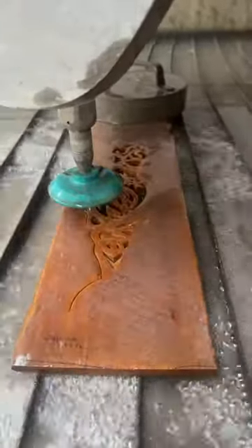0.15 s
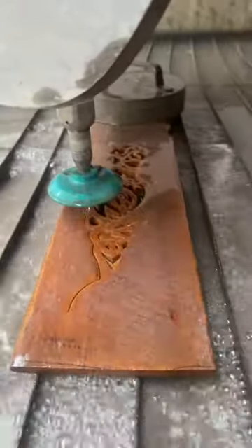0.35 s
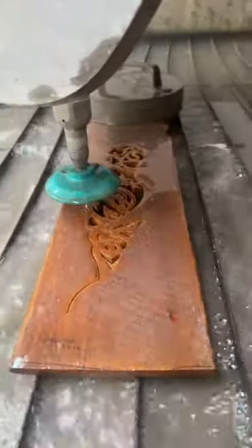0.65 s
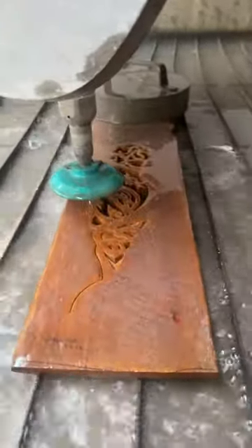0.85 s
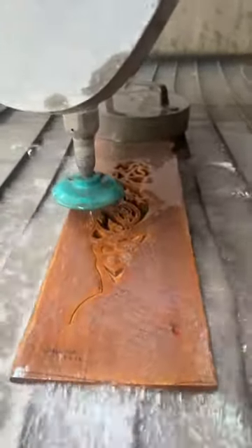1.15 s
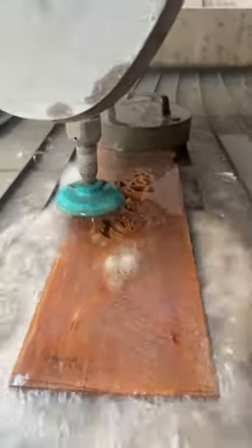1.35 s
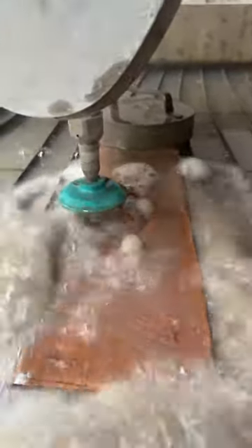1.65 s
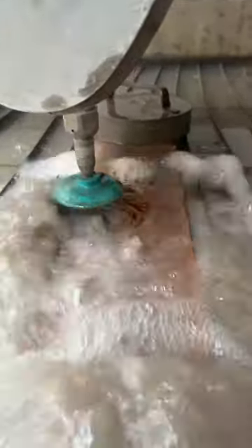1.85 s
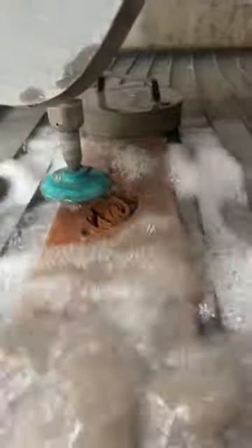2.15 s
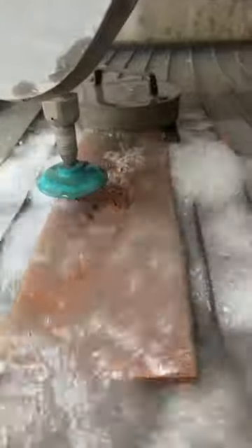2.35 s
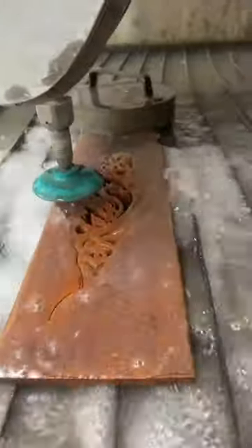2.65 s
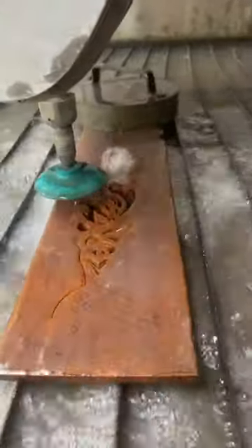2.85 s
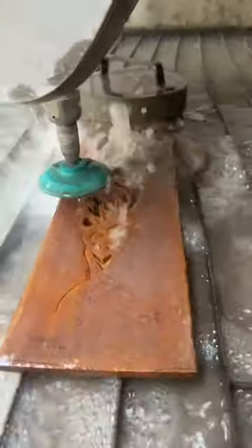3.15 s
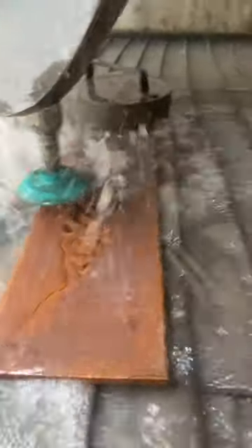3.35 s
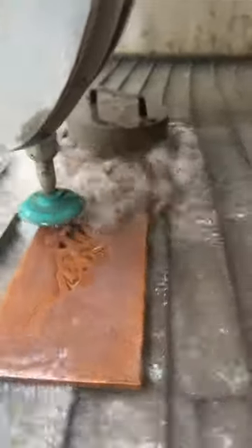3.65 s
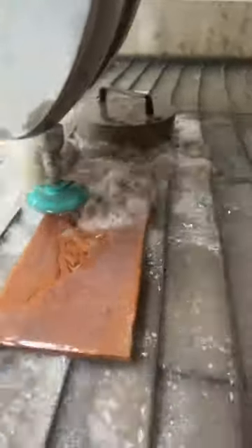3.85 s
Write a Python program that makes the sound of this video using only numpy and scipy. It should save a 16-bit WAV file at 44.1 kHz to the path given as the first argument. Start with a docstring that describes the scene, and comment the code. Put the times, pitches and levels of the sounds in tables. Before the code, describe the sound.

A waterjet cutter hisses and roars over a wooden board, gets smothered by water, then stutters off and on.

```python
"""A waterjet cuts a wooden board, close to a mono microphone in a workshop.
At first the jet hisses, rasps in the kerf and roars in the tank: shaped noise plus bubble rings.
A flood then turns the roar to churn and dulls the rasp, while a smothered hiss loses its top; it clears.
Last, the jet stops four times, each with a diving sine chirp; noise and drop rings trickle in the pauses.
A dull noise puff swells into each restart, and the jet is still running at the end."""
import sys
import numpy as np
from scipy import signal
from scipy.fft import rfft, irfft, next_fast_len
from scipy.io import wavfile
from scipy.ndimage import uniform_filter1d, map_coordinates

SR = 44100
rng = np.random.default_rng(int(sys.argv[2]) if len(sys.argv) > 2 else 0)


def wav_record(signal):
    """Record a signal, one row per channel, as 16-bit PCM in the file named by sys.argv[1]."""
    frames = np.transpose(np.atleast_2d(signal))
    bounded = np.clip(frames, -1, 1)
    # unit amplitude maps onto the largest positive 16-bit level
    quanta = np.round(bounded * 32767).astype(np.int16)
    wavfile.write(sys.argv[1], SR, quanta)


N = 176400


def amp(db):
    """Decibels to gain."""
    return 10 ** (np.asarray(db) / 20)


def unit(x):
    """Scale to rms 1."""
    return x / np.sqrt(np.mean(x ** 2) + 1e-20)


def along(points, hz):
    """Interpolate (Hz, value) points on a log frequency axis."""
    point_hz, value = np.transpose(points)
    return np.interp(np.log(hz + 1), np.log(point_hz + 1), value)


def curves(rows):
    """One value per sample for each column after the time."""
    time_s, *columns = np.transpose(rows)
    return np.array([np.interp(np.arange(N) / SR, time_s, column) for column in columns])


def wobble(knots_per_s):
    """Smooth random curve through normally distributed knots."""
    return map_coordinates(rng.standard_normal(8192), [np.arange(N) * knots_per_s / SR], mode="wrap")


def filtered(x, response):
    """Multiply the spectrum of x by response(hz)."""
    size = next_fast_len(N + SR // 2)
    return irfft(rfft(x, size) * response(np.fft.rfftfreq(size, 1 / SR)), size)[:N]


def coloured(x, spectrum):
    """Shape x with a spectrum, at rms 1."""
    return unit(filtered(x, lambda hz: amp(along(spectrum, hz))))


def lift(resonances, hz):
    """Decibels added by resonances, each a Gaussian over frequency."""
    return sum(db * np.exp(-((hz - centre) / width) ** 2) for centre, width, db in resonances)


def spray(patchy_db, spit_db):
    """White noise in random time-frequency patches, its level spitting by the millisecond; rms 1."""
    z = signal.stft(rng.standard_normal(N), nperseg=512)[2]
    field = uniform_filter1d(rng.standard_normal(z.shape), size=7, axis=0)
    field = uniform_filter1d(field, size=5, axis=1)
    patchy = signal.istft(z * amp(patchy_db * unit(field)), nperseg=512)[1][:N]
    return unit(patchy * amp(spit_db * wobble(700)))


def bubbles(count, hz, spread, cycles, scatter_db):
    """Short damped rings of random pitch and size, down 60 dB after the given cycles; rms 1."""
    when, pitch, size = rng.random(count), rng.standard_normal(count), rng.exponential(size=count)
    t = np.arange(700) / SR
    ring_hz = np.clip(hz * np.exp(spread * pitch), 200, 15000)
    turns = ring_hz[:, None] * t
    ring_gain = amp(scatter_db * np.minimum(size, 4))[:, None]
    rings = ring_gain * np.sin(2 * np.pi * turns) * amp(-60 * turns / cycles)
    at = (when * N).astype(int)[:, None] + np.arange(len(t))
    return unit(np.bincount(at.ravel(), rings.ravel(), N)[:N])


def room(x):
    """Short answer of the tank and the machine: noise decaying faster in the treble."""
    # columns: freq_hz, t60_s
    decay_t60 = [(100, 0.089), (500, 0.055), (3000, 0.045), (12000, .03)]
    hz, t, z = signal.stft(rng.standard_normal(SR // 3), SR, nperseg=256)
    decay = amp(-60 * t / along(decay_t60, hz)[:, None])
    tail = signal.istft(z * decay, SR, nperseg=256)[1]
    delayed = np.pad(tail, (200, 0))  # samples
    return signal.fftconvolve(x, delayed / np.linalg.norm(tail))[:N]


def trickle():
    """Water falls back and drains over the slats: coloured spray and ringing drops."""
    # spectrum; columns: freq_hz, level_db
    trickle_spectrum = [(20, -45), (45, -27), (90, -4), (300, -12), (1200, -2), (2500, -4.5), (4200, -1),
                        (5300, -3), (8000, 1.5), (10000, 2), (11800, -2), (15500, -12)]
    # spray level; columns: time_s, level_db
    trickle_level = [(2.8, -54), (3.23, -52), (3.46, -46), (3.51, -52), (3.62, -50), (3.665, -44),
                     (3.7, -54.5)]
    drops = bubbles(count=900, hz=4440, spread=.6, cycles=39, scatter_db=1)
    runnel = coloured(spray(patchy_db=0.0, spit_db=-2), trickle_spectrum)
    return amp(curves(trickle_level)[0]) * (runnel + amp(-11) * drops)


def puff():
    """Dull noise swelling just before each start of the jet and dying away after it."""
    # jet runs; columns: start_s, stop_s, rise_s
    # spectrum; columns: freq_hz, level_db
    puff_spectrum = [(60, -26), (300, -5), (1200, 3), (2500, -5), (5000, -29), (15000, -45)]
    swell_s, level_db = 0.0049, -36
    t = np.arange(N) / SR
    swell = sum(np.exp(-abs(t - start) / swell_s) for start, stop, rise in JET_RUNS)
    return amp(level_db) * swell * coloured(rng.standard_normal(N), puff_spectrum)


def shut_offs():
    """As the jet breaks off, a chirp dives from treble to bass within milliseconds."""
    # columns: start_s, level_db, cycles per e-fold of time, decay_s
    chirps = [(2.741, -2, 0.89, .007), (3.1939, -2.5, 1.1, 0.0099), (3.4189, -2, 1.03, 0.0065),
              (3.577, -4, 0.97, 0.0091)]
    start_hz, knee_s, rise_s = 4150, 0.0018, 0.000092
    out = np.zeros(N)
    for start_s, level_db, cycles, decay_s in chirps:
        t = np.maximum(np.arange(N) / SR - start_s, 0)
        phase = 2 * np.pi * cycles * np.log1p(t * start_hz / cycles)
        envelope = (1 - np.exp(-t / rise_s)) * np.exp(-t / decay_s) / np.sqrt(1 + t / knee_s)
        out += amp(level_db) * np.sin(phase) * envelope
    return out


def whistle():
    """Narrow band of noise that sings in the nozzle."""
    # columns: time_s, level_db
    whistle_level = [(0, -29), (.35, -34), (.6, -37), (1.3, -41), (1.52, -38), (1.68, -63), (2.1, -57),
                     (2.36, -36), (2.55, -40), (2.92, -36), (3.3, -52)]
    centre_hz, half_width_hz = 5646, 100
    band = filtered(rng.standard_normal(N), lambda hz: 1 / (1 + ((hz - centre_hz) / half_width_hz) ** 2))
    return amp(curves(whistle_level)[0]) * unit(band)


def hiss(level_db):
    """Fine spray through the resonances of nozzle and guard, duller when smothered."""
    # spectrum; columns: freq_hz, level_db
    hiss_spectrum = [(1200, -30), (3500, -9), (4600, -6.5), (5100, -7.5), (6400, 0.5), (7200, 0),
                     (7900, 0.5), (8450, -1.5), (9400, 1), (10700, 0), (11500, -4), (12600, -5.5),
                     (14000, -3.5), (15400, -2)]
    # nozzle and guard; columns: centre_hz, width_hz, lift_db
    nozzle = [(5700, 270, 3.5), (6310, 82, 1.5), (8930, 110, 4), (9670, 500, 5), (10380, 360, 4.5)]
    muffle_below_db, muffle_db_per_db, muffle_hz = -28, 0.81, 10500
    fine = spray(patchy_db=2.0, spit_db=1.5)
    x = unit(filtered(fine, lambda hz: amp(along(hiss_spectrum, hz) + lift(nozzle, hz))))
    top = filtered(x, lambda hz: 1 / (1 + (muffle_hz / (hz + 1)) ** 20))
    top_db = muffle_db_per_db * np.minimum(level_db - muffle_below_db, 0)
    return amp(level_db) * (x - top + top * amp(top_db))


def roar(flood):
    """Jet roaring in the tank, crossfading to a churn under the flood, with gurgling bubbles."""
    # open and flooded spectra; columns: freq_hz, level_db
    roar_spectrum = [(20, -46), (38, -40), (60, -16.5), (100, -3.5), (165, 0), (320, -0.5), (500, 0.5),
                     (800, -4), (1200, -9), (2200, -39), (5000, -70)]
    churn_spectrum = [(25, -65), (45, -40), (70, -19), (130, -12), (220, -4.5), (370, 1.5), (700, -1.5),
                      (1000, -7.5), (1600, -13), (4000, -58)]
    open_roar = np.sqrt(1 - flood) * coloured(spray(patchy_db=2, spit_db=1.5), roar_spectrum)
    churn = np.sqrt(flood) * coloured(spray(patchy_db=1.5, spit_db=1), churn_spectrum)
    gurgle = bubbles(count=900, hz=432, spread=0.32, cycles=15, scatter_db=3)
    return open_roar + churn + amp(-13.5) * gurgle


def kerf(x, flood):
    """Resonance of the cut moves as water fills and leaves it; a flood dulls it."""
    # wet kerf resonance; columns: time_s, centre_hz, lift_db
    kerf_resonance = [(0, 2100, 14), (.25, 2176, 0), (.33, 1200, -2), (.46, 1130, 8), (.58, 1420, 7),
                      (.7, 2200, 1), (.85, 1470, 3), (.96, 1700, 5), (1.08, 1380, 6), (1.24, 1800, 11),
                      (1.34, 1140, -8), (1.55, 1150, -5), (1.64, 1480, 11), (1.715, 2070, 12),
                      (1.77, 1150, -3), (1.86, 1170, 4), (1.92, 1770, 14), (1.97, 1400, 6),
                      (2.025, 2250, 11), (2.05, 3160, 7), (2.16, 1488, -4), (2.29, 3200, 9),
                      (2.36, 1050, -9), (2.47, 3200, 5), (2.68, 2185, -2), (2.97, 1310, -0.5),
                      (3.16, 1850, 3), (3.3, 2850, 2), (3.56, 3550, 1), (3.73, 2475, 1), (3.79, 1900, 7.5),
                      (3.85, 2250, 3), (3.9, 2100, 8.5), (4.0, 2450, 8)]
    # rasp spectrum; columns: freq_hz, level_db
    rasp_spectrum = [(150, -31), (500, -11.5), (900, -4), (1300, -3), (2000, -2), (2600, -2), (3300, 1),
                     (4300, -2.5), (5500, -6.5), (8000, -18), (16000, -55)]
    # gap between guard and board; columns: centre_hz, width_hz, lift_db
    gap = [(990, 150, 3.5), (1273, 60, 5.5), (1443, 87, -2.5), (1530, 36, 2), (1844, 37, 3),
           (2250, 130, 1.5), (2690, 120, -2.5), (3090, 63, 2)]
    width_octaves, skirt_octaves, skirt_db_per_octave = 0.46, 0.82, 5
    dull_db, dull_hz = 6.5, 2390
    hz, t, z = signal.stft(x, SR, nperseg=1024, noverlap=768)
    time_s, centre_hz, lift_db = np.transpose(kerf_resonance)
    octaves = np.log2((hz[:, None] + 1) / np.interp(t, time_s, centre_hz))
    peak_db = np.interp(t, time_s, lift_db) * np.exp(-(octaves / width_octaves) ** 2)
    # the rasp thins out well below the resonance
    skirt_db = skirt_db_per_octave * np.minimum(octaves + skirt_octaves, 0)
    above = 1 / (1 + (dull_hz / (hz + 1)) ** 10)
    dull = np.outer(above, np.interp(t, np.arange(N) / SR, flood ** 2))
    fixed_db = along(rasp_spectrum, hz) + lift(gap, hz)
    gain = amp(fixed_db[:, None] + peak_db + skirt_db - dull_db * dull)
    gain /= np.linalg.norm(gain, axis=0)  # level independent of the shape
    return unit(signal.istft(z * gain, SR, nperseg=1024, noverlap=768)[1][:N])


def rasp(flood):
    """Spray and spattering bubbles ring in the kerf."""
    spatter = bubbles(count=2500, hz=2125, spread=0.451, cycles=23, scatter_db=4)
    return kerf(spray(patchy_db=2.4, spit_db=1.5) + amp(-13) * spatter, flood)


def valve_and_levels():
    """Valve gain, opening and shutting in ramps, and the roar, rasp and hiss levels of each run."""
    # one table per run; columns: time_s, roar_db, rasp_db, hiss_db (before the trims in jet)
    run_levels = [
        [(0, -33, -29.5, -19), (.09, -36.5, -27, -17), (.22, -30, -27, -16.5), (.4, -26, -29, -18),
         (.56, -30.5, -31.5, -19.5), (.68, -29.5, -25, -21), (.95, -30.5, -26, -20.5),
         (1.09, -30.5, -28.5, -20), (1.22, -31, -29.5, -23), (1.28, -33.5, -30.5, -24.5),
         (1.36, -32, -32.5, -17.5), (1.4, -34.5, -35.5, -30), (1.418, -37, -37, -17),
         (1.435, -32.5, -40, -30.5), (1.6, -35, -37.5, -31.5), (1.645, -30.5, -38.5, -36),
         (1.665, -32.5, -40.5, -47), (1.71, -35, -31, -48), (1.722, -34.5, -34, -30.5),
         (1.79, -33, -40.5, -31.5), (1.84, -38.5, -36, -35.5), (1.865, -36, -41.5, -49),
         (1.92, -33, -38.5, -48), (1.945, -37, -40.5, -50), (2.0, -33, -40, -44), (2.01, -32, -28.5, -24.5),
         (2.03, -32, -23.5, -25), (2.055, -34, -29, -39), (2.085, -33, -28, -22.5), (2.11, -31.5, -31.5, -33),
         (2.15, -30.5, -28, -18), (2.21, -34.5, -32.5, -23.5), (2.3, -31.5, -30.5, -20), (2.33, -33, -39, -28),
         (2.445, -28.5, -37, -28), (2.475, -26.5, -20, -17), (2.52, -26, -22, -18), (2.6, -26, -21, -16),
         (2.72, -30, -20.5, -14.5), (2.735, -28.5, -20, -13.5)],
        [(2.882, -37, -30.5, -26), (2.925, -33, -34, -23), (2.945, -32, -26.5, -21.5),
         (3.01, -24.5, -26.5, -17), (3.08, -24.5, -23.5, -20), (3.166, -24.5, -20.5, -19),
         (3.19, -22.5, -24, -18.5)],
        [(3.256, -24.5, -21.5, -21), (3.272, -30, -21.5, -20), (3.298, -38, -24, -20), (3.332, -28, -19.5, -22),
         (3.37, -37, -29.5, -23), (3.386, -30, -19, -14), (3.4, -30, -24, -25), (3.416, -23, -18.5, -14)],
        [(3.536, -23, -24, -17), (3.554, -42, -23, -19.5), (3.574, -26, -17, -17.5)],
        [(3.72, -31, -23, -23.5), (3.745, -42, -26, -23), (3.783, -40, -15.5, -29), (3.82, -38, -29.5, -26),
         (3.846, -44, -27, -30), (3.865, -42, -34, -32), (3.872, -38, -21, -25), (3.902, -36, -17, -21),
         (3.95, -35, -22, -21), (4.0, -42, -20.5, -17)],
    ]
    close_s = 0.00045
    t = np.arange(N) / SR
    valve, levels = np.zeros(N), curves(run_levels[0])
    for (start, stop, rise), rows in zip(JET_RUNS, run_levels):
        valve += np.clip((t - start) / rise, 0, 1) * np.clip((stop - t) / close_s + 1, 0, 1)
        levels = np.where(t >= start, curves(rows), levels)
    return valve, levels


def jet():
    """Roar, rasp, hiss and whistle flutter together and are cut off by the valve."""
    # water over the board; columns: time_s, depth (0-1)
    flood_depth = [(1.15, 0.1), (1.45, .85), (1.9, 1), (2.1, 0.85), (2.4, 0.57), (2.5, 0)]
    # the jet spits; columns: time_s, boost_db
    spits = [(.102, 2), (0.164, 0.5), (0.338, 2.5), (0.833, 4), (.866, 5), (2.68, 5), (3.131, 4.5),
             (3.275, 4), (3.302, 6.5), (3.56, 1.5)]
    spit_s = 0.0035
    t = np.arange(N) / SR
    valve, (roar_db, rasp_db, hiss_db) = valve_and_levels()
    flood = np.clip(curves(flood_depth)[0], 0, 1)
    spit_db = sum(db * np.exp(-((t - s) / spit_s) ** 2) for s, db in spits)
    flutter = amp(spit_db + 0.55 * wobble(60) + 0.82 * wobble(190))
    water = amp(roar_db - 0.5) * roar(flood) + amp(rasp_db + 0.87) * rasp(flood)
    treble = amp(0.3) * hiss(hiss_db + 0.71 * wobble(110)) + whistle()
    return valve * flutter * (water + treble)


# the jet is open; columns: start_s, stop_s, rise_s
JET_RUNS = [(-.1, 2.7412, .004), (2.877, 3.1942, .002), (3.249, 3.419, 0.0069), (3.532, 3.577, .002),
            (3.714, 4.113, 0.0022)]


def scene():
    """The cutter, its short room answer and its water, alike in both channels."""
    cutter = jet() + puff() + shut_offs()
    return np.tile(cutter + amp(-21.5) * room(cutter) + trickle(), (2, 1))


def record(dry):
    """The microphone drops the deepest bass and keeps nothing above the band limit."""
    low_cut_hz, top_hz = 53, 15780
    thin = signal.sosfilt(signal.butter(2, low_cut_hz, "high", fs=SR, output="sos"), dry)
    return np.array([filtered(x, lambda hz: hz < top_hz) for x in thin])


dry = scene()
out = record(dry)
wav_record(out)
```